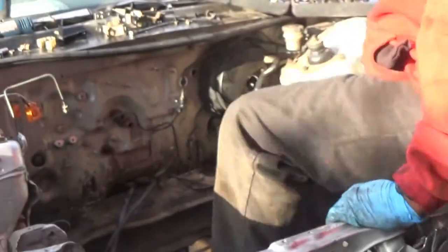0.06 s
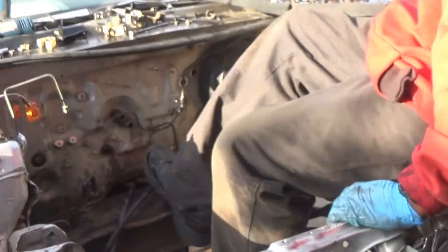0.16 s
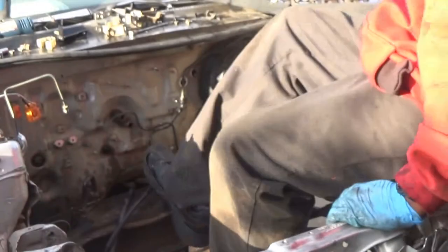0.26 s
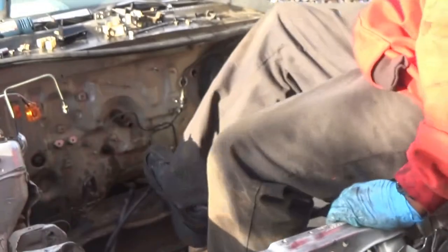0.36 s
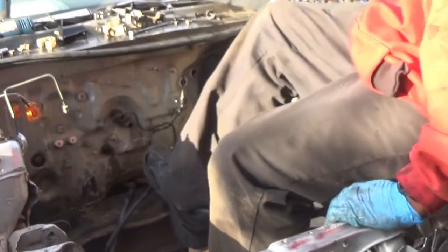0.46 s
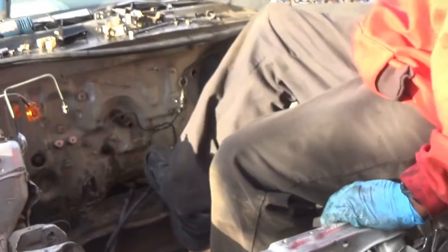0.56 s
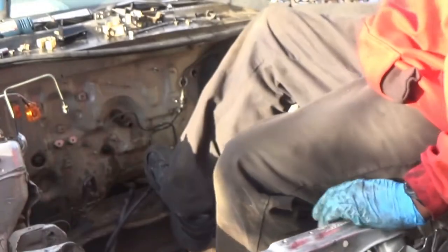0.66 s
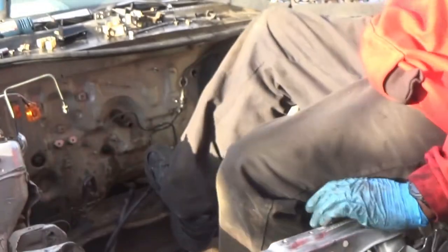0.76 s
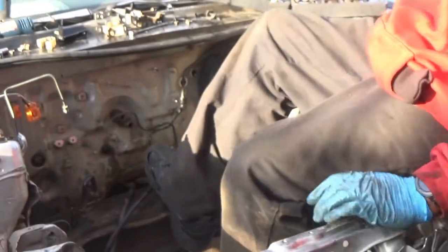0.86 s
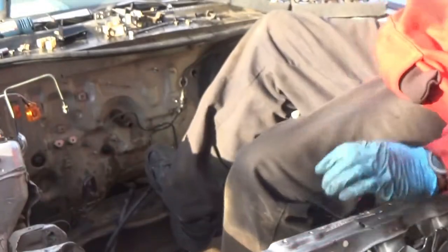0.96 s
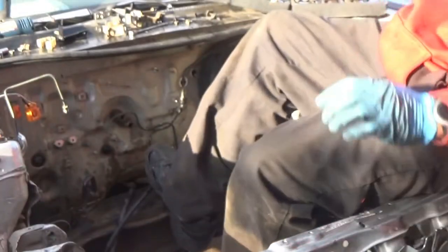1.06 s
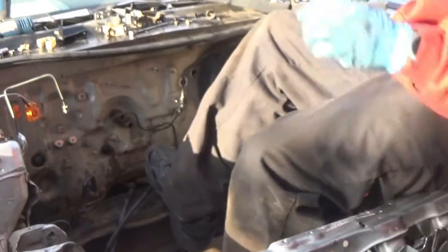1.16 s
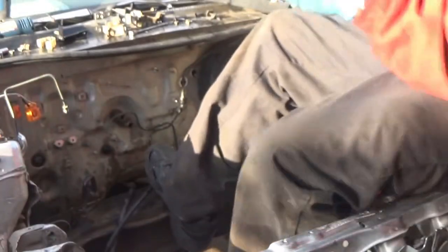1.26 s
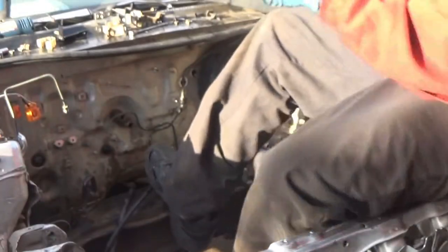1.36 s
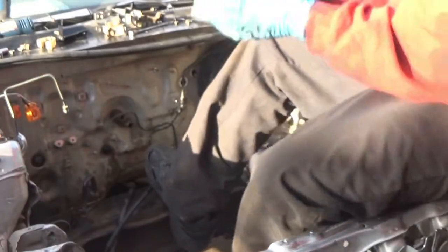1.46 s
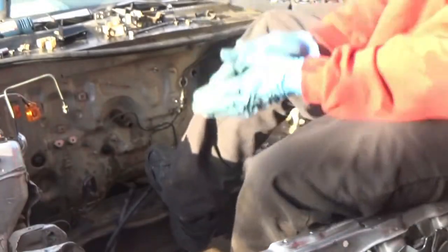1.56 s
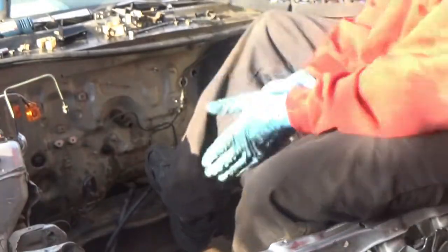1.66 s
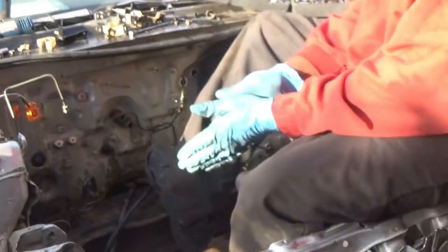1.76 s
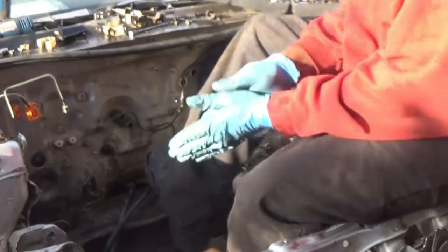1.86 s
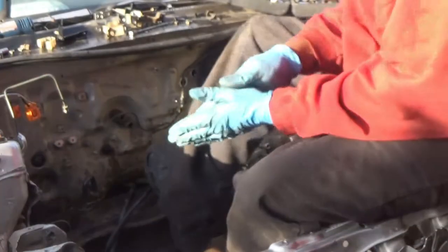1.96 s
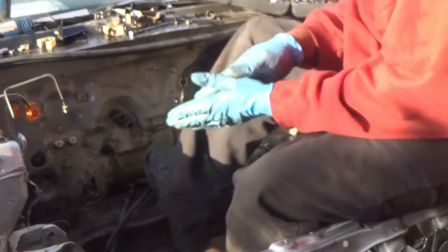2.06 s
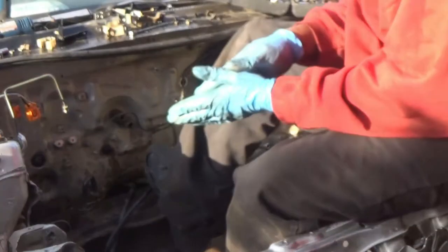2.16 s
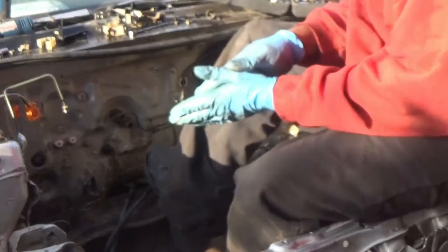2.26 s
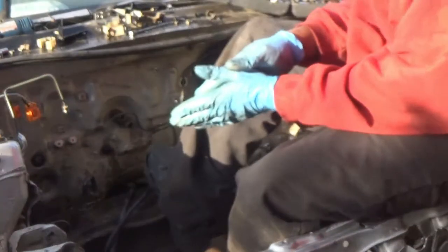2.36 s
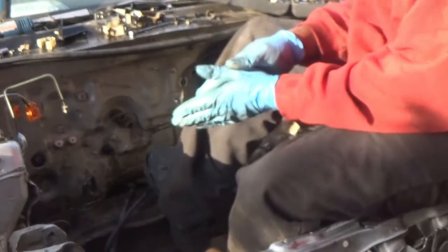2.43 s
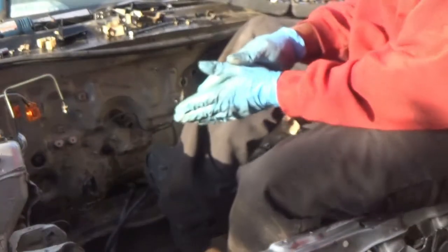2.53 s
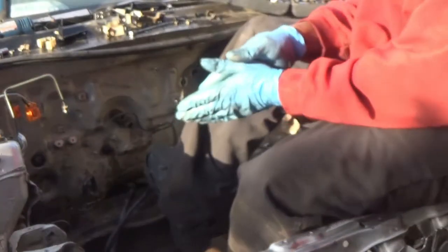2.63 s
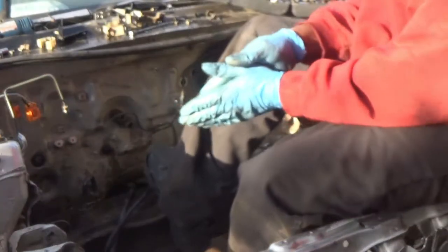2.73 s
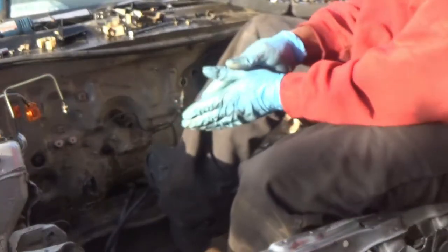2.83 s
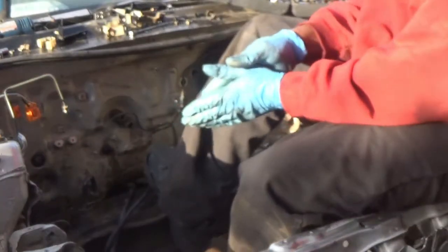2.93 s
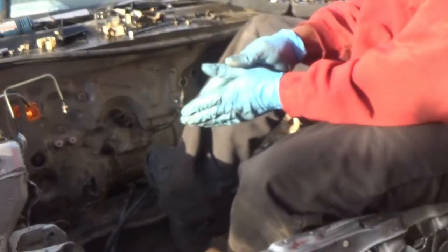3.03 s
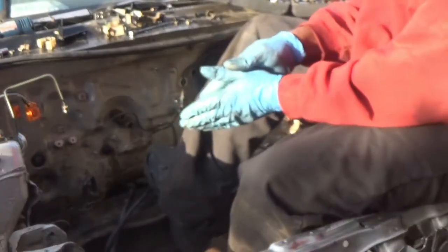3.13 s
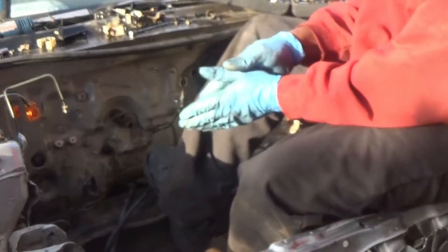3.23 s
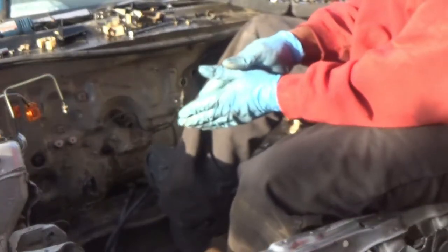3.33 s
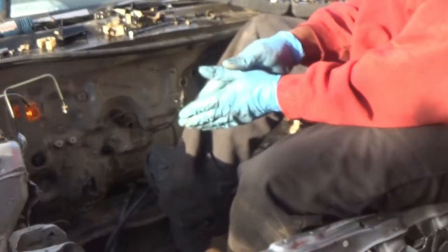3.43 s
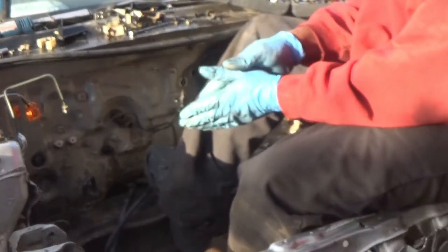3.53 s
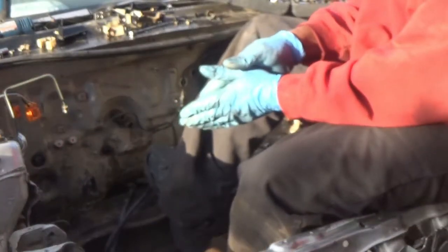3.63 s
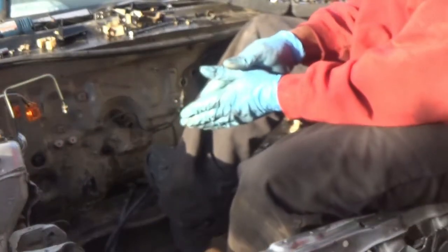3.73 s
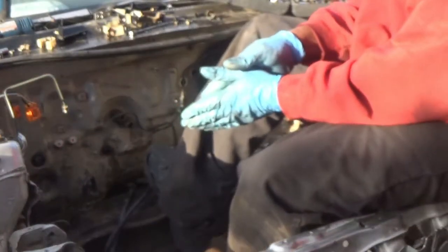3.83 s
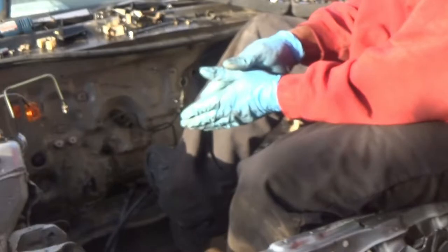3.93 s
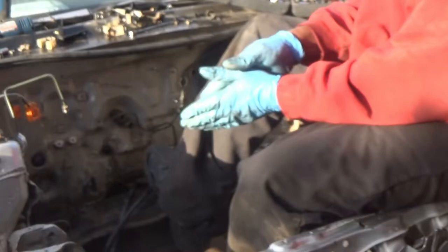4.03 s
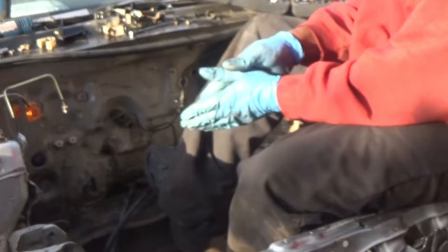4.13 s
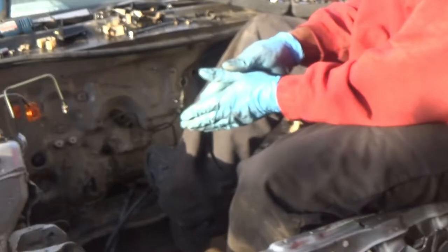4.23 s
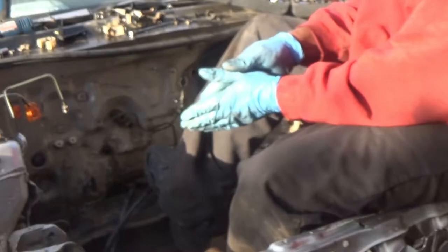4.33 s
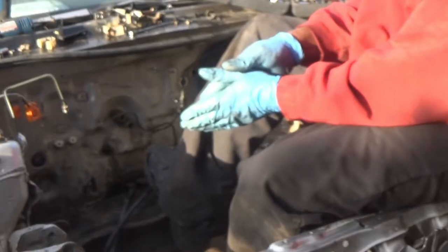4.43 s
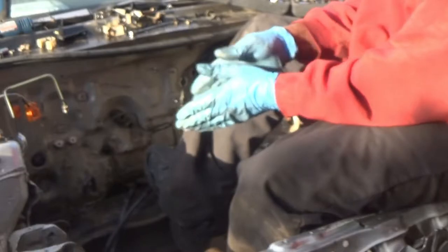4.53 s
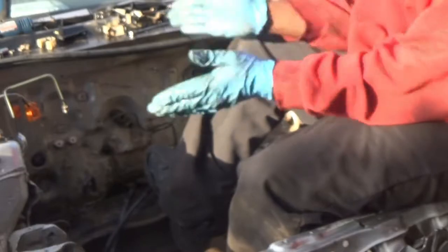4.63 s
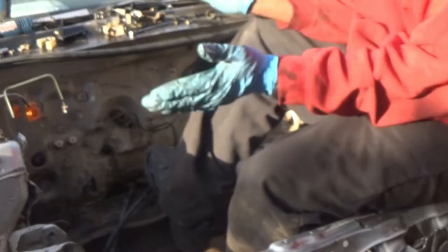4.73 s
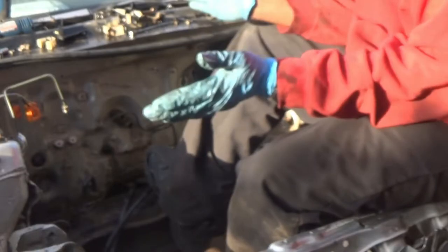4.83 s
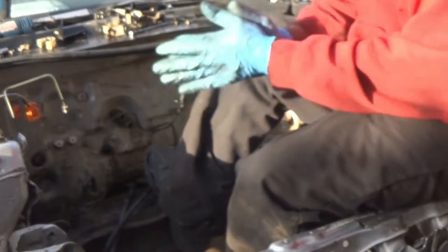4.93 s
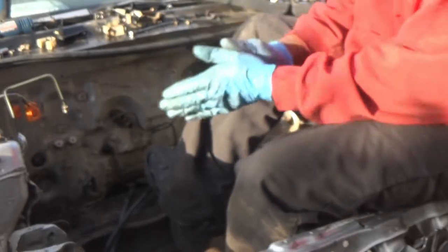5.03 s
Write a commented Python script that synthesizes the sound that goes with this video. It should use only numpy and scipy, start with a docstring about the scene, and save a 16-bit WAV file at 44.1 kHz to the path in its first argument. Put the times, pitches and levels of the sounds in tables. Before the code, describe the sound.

One sharp, loud clap of rubber-gloved hands follows faint fabric rustling and a small sticky snap, over distant birds and town rumble.

```python
"""Sleeves and trousers rustle as someone in rubber gloves shifts in a car's empty engine bay, outdoors.
The tacky gloves creak and peel apart with a snap; then the hands clap once, the loudest sound,
and the sheet-metal panels echo and ring. Small birds chirp some way off,
the camera whines faintly and a distant town rumbles."""
import sys
import numpy as np
from scipy import signal
from scipy.fft import rfft, irfft, next_fast_len
from scipy.io import wavfile
from scipy.ndimage import uniform_filter1d

SR = 44100
rng = np.random.default_rng(int(sys.argv[2]) if len(sys.argv) > 2 else 0)


def digitize_waveform(pressure):
    """Quantize a signal to 16-bit integers and store it at the path in sys.argv[1].

    Rows of a 2-D input are taken as channels; values are limited to [-1, 1].
    """
    field = np.atleast_2d(pressure).T
    bounded = np.clip(field, -1, 1)
    quanta = np.round(bounded * 32767).astype(np.int16)
    wavfile.write(sys.argv[1], SR, quanta)


N = 224403
T = np.arange(N) / SR
TAIL_SAMPLES = 16384

# fingers touch, then palms meet: t/s, level/dB, decay/s
HAND_IMPACTS = [(4.9405, -22, .003), (4.942, -9.5, .0015)]
# impact spectrum: f/Hz, level/dB
IMPACT_SPECTRUM = [(150, -22), (500, -8.5), (800, 0), (1300, -1.5), (2000, 2), (2700, 0), (3600, -1),
                   (4400, 8), (5200, 0), (6200, -8), (8000, -7), (10200, -7), (12500, -24), (16000, -42)]
# near-panel reflections: delay/s, level/dB
PANEL_ECHOES = [(.0055, -12), (0.0137, -16), (0.0253, -18.5), (.048, -19), (.0846, -29)]
# dense-echo spectrum: f/Hz, level/dB
BAY_SPECTRUM = [(100, -27), (290, -15), (480, -19), (680, -5.5), (1150, -10), (1650, -2), (2400, -4.5),
                (3200, -8.5), (4600, -6), (5300, -5.5), (6100, -15.5), (8000, -13), (10500, -22),
                (15000, -36)]
# sheet-metal resonances: f/Hz, level/dB, T60/s
PANEL_MODES = [(780, -39, .3), (848, -35, 0.56), (1557, -25, 0.33), (1688, -29.5, 0.33), (1760, -27, 0.27),
               (1967, -21.5, 0.19), (2090, -26, 0.26), (2320, -32, 0.37), (4260, -33, .25),
               (4308, -32, 0.2), (4511, -22, 0.22), (4570, -25, 0.22), (4750, -27, 0.21), (5010, -29, 0.24),
               (5270, -27, 0.22), (5220, -28, 0.21)]
def clap(at_s=4.9421, echo_decay_s=.002):
    """The palms crack, the thin rubber slaps flat, and the bay's panels echo and ring."""
    echoes = [(at_s + delay_s, db, echo_decay_s) for delay_s, db in PANEL_ECHOES]
    out = cracks(HAND_IMPACTS + echoes, IMPACT_SPECTRUM, rise_s=.00024, side_db=-8.5)
    slap_hz_db = [(3000, -3), (4500, -5), (7000, -22), (10000, 8), (12500, -20), (16000, -28)]
    out += cracks([(4.9434, -14.5, .00071)], slap_hz_db, rise_s=.00015, side_db=-8)
    tail = bay_tail(BAY_SPECTRUM, build_s=.008, limiter_hold_s=.047, t60_scale=.86)
    add(out, at_s, undb(-18.5) * pan(-1.8) * tail)
    t = T[:TAIL_SAMPLES]
    build = 1 - np.exp(-t / .0079)  # echoes feed the modes
    for hz, db, t60_s in PANEL_MODES:
        phase = rng.uniform(0, 2 * np.pi) + .3 * rng.standard_normal((2, 1))  # channels out of step
        envelope = build * np.exp(-np.log(1000) * t / t60_s)
        add(out, at_s, undb(db) * pan(-1.7) * envelope * np.sin(2 * np.pi * hz * t + phase))
    return out


# bay decay before t60_scale: f/Hz, T60/s
BAY_DECAY = [(200, 0.33), (800, 0.35), (2000, 0.34), (4500, 0.3), (8000, 0.24), (15000, 0.2)]
def bay_tail(spectrum, build_s, limiter_hold_s, t60_scale):
    """Dense echoes build up and fade, treble first;
    their loud start is held level, as by a recorder's limiter."""
    t = T[:TAIL_SAMPLES]
    hz = np.fft.rfftfreq(TAIL_SAMPLES, 1 / SR)
    wash = rfft(noise(spectrum, TAIL_SAMPLES))
    fading_s = np.hypot(t, limiter_hold_s) - limiter_hold_s
    centres_hz, t60s = np.transpose(BAY_DECAY)
    out = 0
    for share, t60_s in zip(np.eye(len(centres_hz)), t60s):
        band = irfft(wash * log_interp(hz, np.c_[centres_hz, share]))
        out += band * np.exp(-np.log(1000) * fading_s / (t60_s * t60_scale))
    return out * (1 - np.exp(-t / build_s))


# run of tiny snaps as the rubber unsticks: t/s, level/dB, decay/s
GLOVE_SNAPS = [(4.502, -42, .004), (4.5067, -25.5, .002), (4.5089, -20, 0.0015), (4.5107, -16, .001),
               (4.5143, -26.5, 0.0011), (4.5165, -27.5, .003)]
# snap spectrum: f/Hz, level/dB
SNAP_SPECTRUM = [(300, -28), (700, -28), (1300, -31), (2200, -15), (3200, -14), (4300, -7), (5250, 4),
                 (5800, -2.5), (7500, -9), (9200, -5), (10900, -8.5), (16000, -33)]
# bay's answer to the snaps: f/Hz, level/dB
SNAP_TAIL_SPECTRUM = [(300, -13), (800, -2.5), (1120, 0), (2400, -9.5), (4000, -7.5), (5200, -3.5),
                      (7000, -5), (10700, -7), (16000, -29)]
# rubber-on-rubber creak: f/Hz, level/dB
CREAK_SPECTRUM = [(1700, -22), (2700, 1), (3300, -3), (4000, -1), (5500, -19), (7200, -16), (9000, -25),
                  (11000, -40)]
def glove_peel():
    """Tacky rubber creaks, then lets go; the bay answers softly."""
    snaps = cracks(GLOVE_SNAPS, SNAP_SPECTRUM, rise_s=.00015, side_db=-9)
    tail = bay_tail(SNAP_TAIL_SPECTRUM, build_s=.002, limiter_hold_s=.001, t60_scale=.61)
    add(snaps, 4.51, undb(-36.5) * tail)
    creak = undb(-45) * noise(CREAK_SPECTRUM) * swell(4.356, rise_s=.005, fall_s=.0081)
    return snaps * pan(-1.7) + creak


# leg or sleeve slides: fastest t/s, rise/s, fall/s, rub level/dB, hiss level/dB
LIMB_STROKES = [(.22, .02, .05, -57, -68), (.348, 0.027, 0.04, -50, -55.5),
                (.425, 0.023, 0.038, -50.5, -62.5), (.685, 0.033, 0.035, -57, -59.5),
                (.76, .03, 0.048, -58, -64.5), (0.938, 0.028, .024, -61, -59.5),
                (1.19, 0.065, 0.047, -58, -61.5), (1.245, 0.015, 0.056, -47.5, -54),
                (1.472, 0.015, .03, -51, -60), (1.595, .05, 0.043, -44.5, -53.5),
                (1.745, .03, 0.047, -55, -60), (1.97, .11, 0.067, -63.5, -66.5)]
# fabric rubbing: f/Hz, level/dB
RUB_SPECTRUM = [(250, -7), (370, 2), (500, -17), (700, 0), (1150, -5), (1700, 1), (2600, -0.5),
                (3800, -3.5), (5500, -9.5), (9000, -23)]
# fibre hiss: f/Hz, level/dB
HISS_SPECTRUM = [(3000, -12), (5000, 1), (8000, -5), (11000, 0), (13000, -13), (16000, -23)]
# pitched scuffs of folds and boots: t/s, rise/s, fall/s, f/Hz, half-width/oct, level/dB
PITCHED_SCUFFS = [(.348, .01, .016, 800, .22, -50), (.425, 0.014, .018, 800, .5, -48),
                  (.425, .011, .018, 230, .55, -50.5), (1.233, .003, 0.036, 1300, .8, -50.5),
                  (1.597, .031, .026, 2800, .42, -41.8), (1.62, .08, .07, 380, .25, -60),
                  (1.74, .022, .03, 5100, 0.16, -57.5), (2.515, .008, .016, 2500, .49, -54)]
# creases flicking over: t/s, level/dB, decay/s
CREASE_TICKS = [(.2445, -49.5, .002), (1.319, -45, .004), (1.601, -44, .002)]
# tick spectrum: f/Hz, level/dB
TICK_SPECTRUM = [(2000, -10), (5000, -7), (9000, 0), (15000, -9)]
def cloth_rustle():
    """Fabric catches and slips in tiny grains with each stroke; folds scuff and creases tick."""
    rub_power = hiss_power = 0
    for at_s, rise_s, fall_s, rub_db, hiss_db in LIMB_STROKES:
        speed = swell(at_s, rise_s, fall_s)
        rub_power += (undb(rub_db) * speed) ** 2
        hiss_power += (undb(hiss_db) * speed) ** 2
    out = noise(RUB_SPECTRUM) * np.sqrt(rub_power) * undb(.92 * walk(300))
    out += noise(HISS_SPECTRUM, side_db=-10) * np.sqrt(hiss_power) * undb(1.6 * walk(900))
    for at_s, rise_s, fall_s, hz, half_width_oct, db in PITCHED_SCUFFS:
        hump = [(hz * 2 ** (k * half_width_oct), -3 * k * k) for k in range(-3, 4)]
        out += undb(db) * noise(hump) * swell(at_s, rise_s, fall_s)
    out *= undb(.97 * walk(120))
    return out + cracks(CREASE_TICKS, TICK_SPECTRUM, rise_s=.0004, side_db=-6)


# up-down whistles, at the top: t/s, f/Hz, level/dB
BIRD_ARCHES = [(.241, 4220, -51.5), (.735, 4340, -56), (.826, 4160, -46), (2.27, 4600, -56),
               (2.359, 4210, -52), (3.069, 4200, -53), (3.925, 4500, -57.5), (4.016, 4250, -54.5)]
# rasping down-slides: t/s, length/s, start f/Hz, level/dB
BIRD_SLURS = [(.74, .05, 4000, -54.5), (1.055, .04, 3950, -56.5), (2.122, .04, 4750, -54.5),
              (2.165, .058, 3900, -50.5), (2.28, .05, 4800, -56), (2.288, .04, 3150, -56),
              (2.931, 0.081, 4100, -49.5), (3.946, .05, 3100, -58), (4.626, 0.088, 3840, -53.5)]
# short falling notes: t/s, start f/Hz, level/dB
BIRD_PIPS = [(.585, 6950, -61), (4.19, 2420, -58.5), (4.43, 2415, -55)]
def birds(arch_rise_s=.022, arch_fall_s=.017, arch_depth_oct=.62):
    """Small birds whistle arches, slurs and pips, scattered by the yard."""
    song = np.zeros((1, N))
    t = np.arange(-arch_rise_s, arch_fall_s, 1 / SR)
    arch = 2 ** (-arch_depth_oct * np.maximum(-t / arch_rise_s, t / arch_fall_s))
    for at_s, hz, db in BIRD_ARCHES:
        add(song, at_s - arch_rise_s, bird_note(hz * arch, db, rasp=.016))
    for at_s, length_s, hz, db in BIRD_SLURS:
        add(song, at_s, bird_note(glide(hz, length_s, oct_per_s=-7.9), db, rasp=.067))
        second_voice = bird_note(glide(5360, length_s, oct_per_s=-4.5), db - 9.5, rasp=.067)
        add(song, at_s - .016, second_voice)
    for at_s, hz, db in BIRD_PIPS:
        add(song, at_s, bird_note(glide(hz, length_s=.043, oct_per_s=-3), db, rasp=.035))
    # a farther bird repeats one sagging note, loudest mid-series
    sag_hz = glide(3860, length_s=.088, oct_per_s=-1.3)
    for k, place in enumerate(np.linspace(-1, 1, 8)):
        add(song, 2.695 + k * .121, bird_note(sag_hz, db=-58.5 - 5 * place ** 2, rasp=.035))
    long_whistle = bird_note(glide(1440, length_s=.25, oct_per_s=.24), db=-58)
    add(song, 4.69, long_whistle)
    return (song + undb(-7.5) * yard_echo(song)) * pan(3.1)


def bird_note(path_hz, db, rasp=0):
    """A whistle swells and fades along a pitch path; fast pitch flutter makes it rasp."""
    progress = np.linspace(0, 1, len(path_hz))
    envelope = 2 * np.sqrt(progress * (1 - progress))
    flutter = 1 + rasp * walk(1500)[:len(path_hz)]
    phase = 2 * np.pi * np.cumsum(path_hz * flutter) / SR
    return undb(db) * envelope * np.sin(phase)[None]


def yard_echo(song, decay_s=.04):
    """The yard scatters sound into a short, wide tail."""
    response = noise([(1000, 0), (8000, 0)], TAIL_SAMPLES, side_db=5.5)
    response *= np.exp(-T[:TAIL_SAMPLES] / decay_s)
    response /= np.linalg.norm(response[0])
    return signal.fftconvolve(song, response, axes=1)[:, :N]


# stepped whine settings: from t/s, f/Hz, level/dB
WHINE_STEPS = [(0, 2870, -63), (1.75, 2620, -68), (2.0, 3040, -65), (2.75, 3030, -67.5)]
def camera_whine(frame_hz=30):
    """A thin tone and faint buzz inside the camera swell once per frame; the tone bends in step."""
    starts_s, pitches_hz, levels_db = np.transpose(WHINE_STEPS)
    step = np.searchsorted(starts_s[1:], T)
    beat = np.cos(2 * np.pi * frame_hz * T)
    hz = pitches_hz[step] + 45 * beat + 55 * walk(500)
    phase = 2 * np.pi * np.cumsum(hz) / SR
    tone = np.sin(phase) + undb(-21.5) * np.sin(2 * phase) + undb(-17) * np.sin(3 * phase)
    buzz = noise([(2000, -2.5), (3300, 1), (4400, 1.5), (5200, -6.5), (9000, -17)])
    return undb(levels_db[step]) * tone * (1 + .87 * beat) + undb(-68.5) * buzz * (1 + .58 * beat)


# distant town: f/Hz, level/dB
TOWN_SPECTRUM = [(25, -8), (45, -4), (80, 1), (155, -.5), (200, -7), (270, -5), (370, -9), (470, -7.5),
                 (600, -8), (1150, -11), (1700, -18), (3200, -20), (5500, -28), (16000, -39)]
def town_rumble(start_db=-52, fade_db_per_s=.5):
    """Distant rumble wavers slightly and slowly recedes."""
    return noise(TOWN_SPECTRUM) * pan(.59) * undb(start_db - fade_db_per_s * T + .5 * walk(7.8))


# sound-field width: f/Hz, side-minus-mid level/dB
STEREO_WIDTH = [(30, -24), (60, -33), (125, -24.5), (250, -13.5), (1000, -6.5), (4000, -8.5), (8000, -10),
                (14000, -33)]
def noise(spectrum, size=N, side_db=0):
    """Stereo noise of rms 1, shaped by (f/Hz, level/dB) points and rolled off beyond them."""
    n = next_fast_len(size)
    hz = np.fft.rfftfreq(n, 1 / SR)
    rolloff = np.minimum(hz / spectrum[0][0], 1) ** 2 / np.maximum(hz / spectrum[-1][0], 1) ** 2
    mid, side = rfft(rng.standard_normal((2, n))) * undb(log_interp(hz, spectrum)) * rolloff
    side *= undb(log_interp(hz, STEREO_WIDTH) + side_db)
    return unit(irfft([mid + side, mid - side], n)[:, :size])


def cracks(rows, spectrum, rise_s, side_db):
    """Abrupt noise bursts that die within milliseconds."""
    out, t = np.zeros((2, N)), T[:2048]
    for at_s, db, decay_s in rows:
        envelope = np.exp(-t / decay_s) * (1 - np.exp(-t / rise_s))
        burst = noise(spectrum, len(t), side_db) * envelope
        rms = undb(db) * np.sqrt(decay_s / 2 / t[-1])  # db: level at the start of the decay
        add(out, at_s, rms * unit(burst))
    return out


def swell(peak_s, rise_s, fall_s):
    """Gain of a movement that peaks smoothly."""
    away = np.maximum((peak_s - T) / rise_s, (T - peak_s) / fall_s)
    return np.exp(1 - np.sqrt(1 + np.minimum(away, 20) ** 2))


def glide(start_hz, length_s, oct_per_s):
    """Steadily sliding pitch in Hz."""
    return start_hz * 2 ** (oct_per_s * T[:int(length_s * SR)])


def walk(rate_hz):
    """Smooth random wander of rms 1."""
    hold = max(int(SR / rate_hz), 1)
    steps = np.repeat(rng.standard_normal(N // hold + 1), hold)
    return unit(uniform_filter1d(steps, hold)[:N])


def log_interp(hz, points):
    """Read (f/Hz, value) points on a log-frequency axis."""
    points_hz, values = np.transpose(points)
    return np.interp(np.log(hz + 1), np.log(points_hz), values)


def undb(db):
    """Decibels to gain."""
    return 10 ** (np.asarray(db) / 20)


def unit(x):
    """Scale to rms 1."""
    return x / np.sqrt(np.mean(x ** 2))


def pan(left_minus_right_db):
    """Left and right gains."""
    return undb(np.array([[.5], [-.5]]) * left_minus_right_db)


def add(out, at_s, sound):
    """Mix a sound in, in place."""
    i = int(at_s * SR)
    out[:, i:i + sound.shape[1]] += sound[:, :N - i]


def scene():
    """All sources, summed in stereo."""
    return clap() + glove_peel() + cloth_rustle() + birds() + camera_whine() + town_rumble()


def record(dry):
    """The microphone opens a moment late, rounds the highest peaks and cuts the top treble."""
    open_s, cutoff_hz = .216, 15800
    gate = np.clip((T - open_s) / .002, 0, 1)
    rounded = np.tanh(1.206 * dry) / 1.198
    lowpass = signal.ellip(8, .2, 70, cutoff_hz, fs=SR, output="sos")
    return signal.sosfilt(lowpass, rounded * gate)


dry = scene()
out = record(dry)
digitize_waveform(out)
```